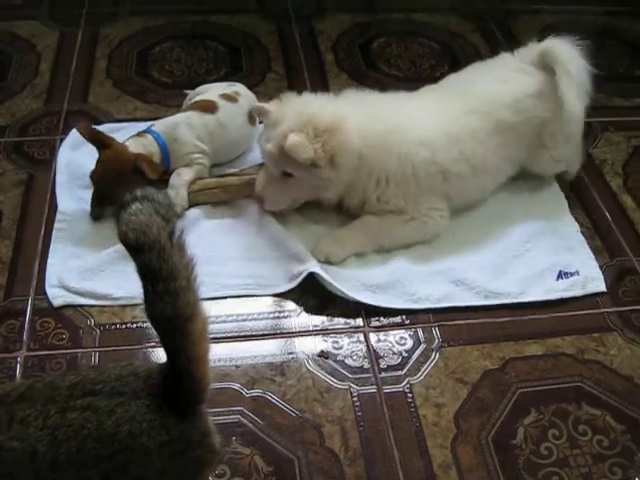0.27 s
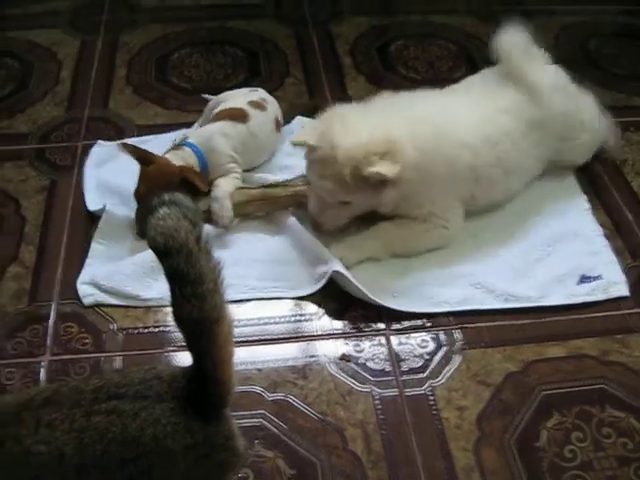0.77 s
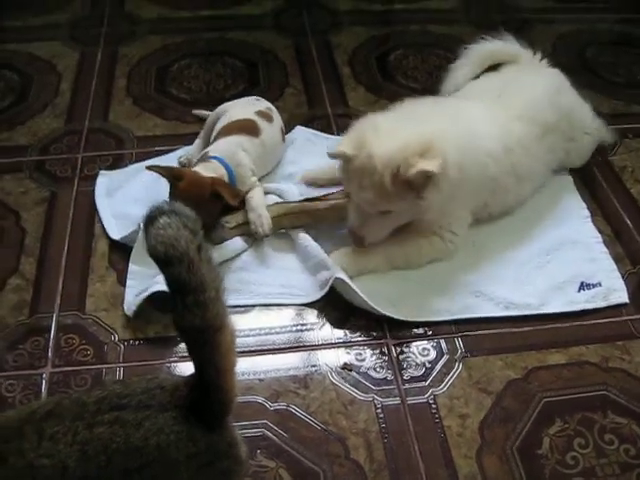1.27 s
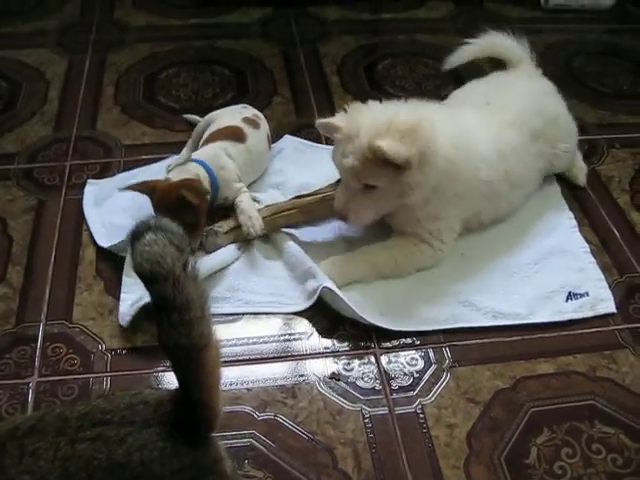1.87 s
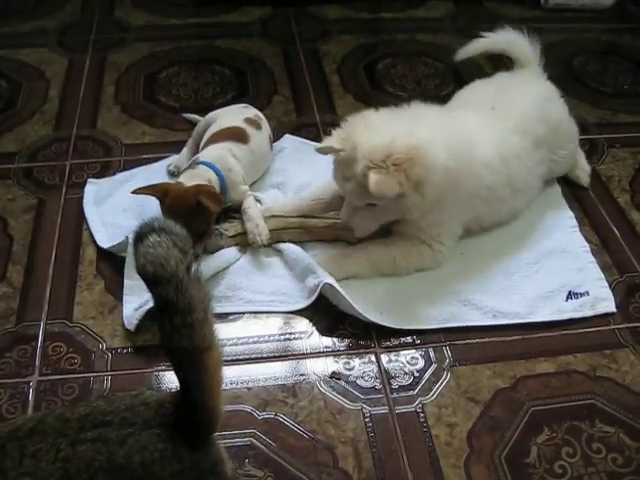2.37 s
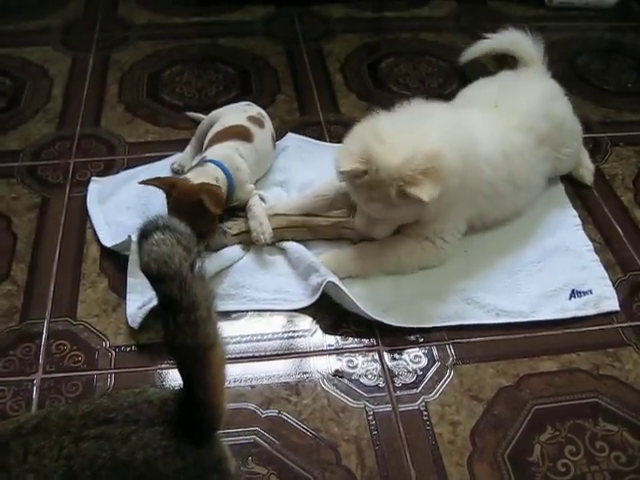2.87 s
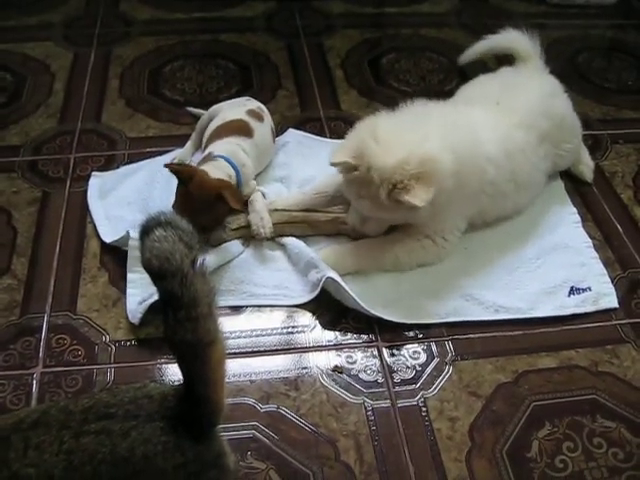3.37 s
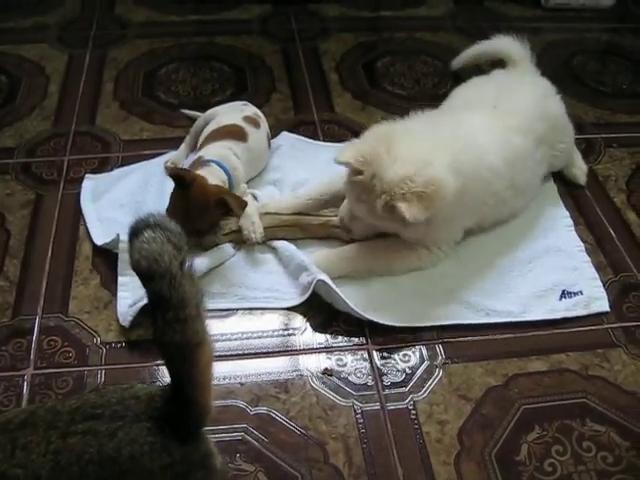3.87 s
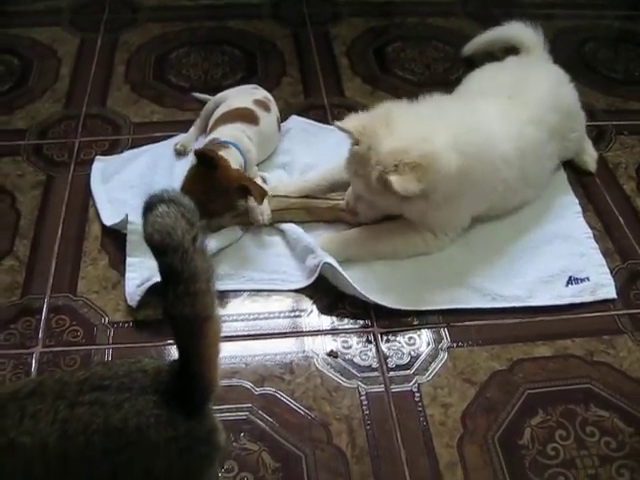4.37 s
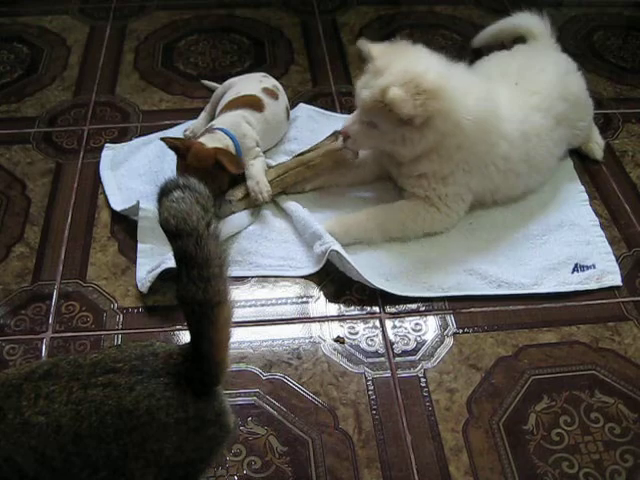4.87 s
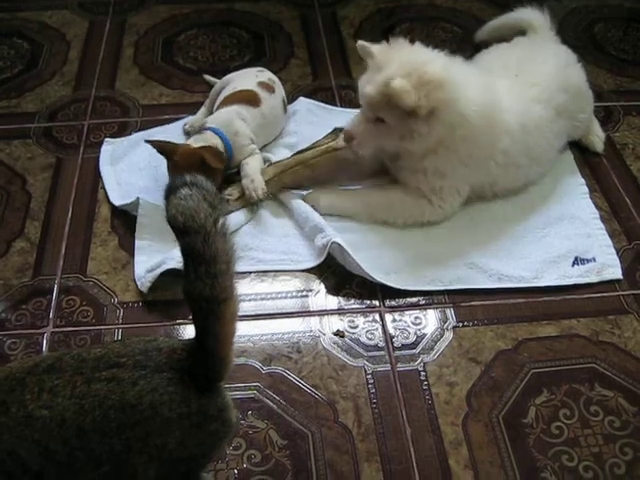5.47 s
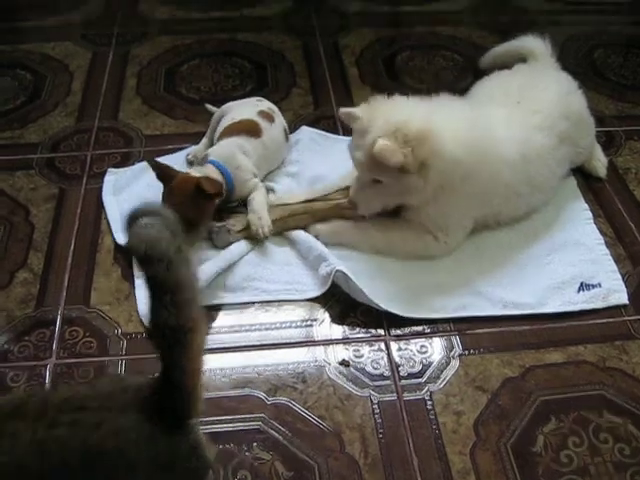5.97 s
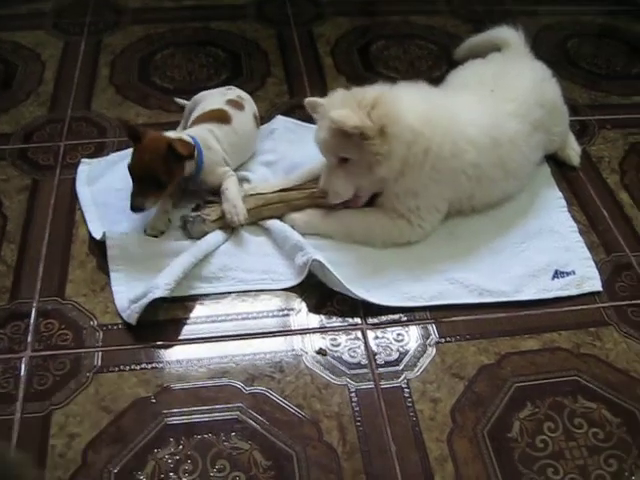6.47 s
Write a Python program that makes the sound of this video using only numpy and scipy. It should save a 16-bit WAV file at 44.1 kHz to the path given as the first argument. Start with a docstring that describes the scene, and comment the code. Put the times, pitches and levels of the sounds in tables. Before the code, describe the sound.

Close at the microphone, fingers rub and squeak over a plastic case for just over a second, with small clicks. Then the tiled room is quiet: two puppies' teeth tick and crack sparsely on a chew bone, the bone knocks the padded floor once, and a wall clock steps softly each second over faint hiss and whirr. Near the end the case snaps very loudly, followed by light rubbing.

```python
"""Puppies gnawing in a tiled room

In the room two puppies gnaw a chew bone on a towel: cracks and damped mouth modes, rasping drags, one
floor knock with a bounce. A wall clock steps each second as gated noise over a faint steady whirr.
Close on the microphone, fingers rub the camera's case for just over a second as filtered skin slips;
near the end the case snaps loudly, a burst of damped shell modes, and is rubbed again."""
import sys
import numpy as np
from scipy import signal
from scipy.fft import rfft, irfft, next_fast_len
from scipy.io import wavfile
from scipy.ndimage import uniform_filter1d, map_coordinates

SR = 44100
rng = np.random.default_rng(int(sys.argv[2]) if len(sys.argv) > 2 else 0)


def to_wav(s):
    """Save 16-bit WAV."""
    ch = np.atleast_2d(s).T  # columns
    pcm = np.round(np.clip(ch, -1, 1) * 32767)  # PCM
    wavfile.write(sys.argv[1], SR, pcm.astype(np.int16))


N = 296352

# Levels in the tables are relative settings, ahead of the room and the microphone.
# teeth on the bone: start_s, level_db, mouth_hz (lower resonance), crack_db, room_db
BITES = [(1.281, -30, 960, -13, -4), (1.319, -27.5, 1690, 9, -3), (1.361, -32.5, 1030, -3, -1.5),
         (1.809, -29.5, 1045, -16, 2.5), (2.6, -28, 1810, -25, -8), (3.123, -32.5, 818, -7, 1.5),
         (3.139, -30, 860, -18, -11), (3.454, -33, 845, -13, 1.5), (3.816, -28.5, 870, -18, -0.5),
         (3.856, -35.5, 720, -5, -2), (4.312, -29.5, 865, -22.5, 0.5), (4.378, -36.5, 810, 0, -2),
         (5.696, -37, 1100, 12, -13), (5.947, -20, 1120, -17, -7.5), (6.021, -38.5, 1130, -13, 4)]
# a tooth drags along the bone: middle_s, half_length_s, level_db, mouth_hz
GRINDS = [(1.32, 0.0081, -45.5, 2820), (1.447, 0.019, -44, 1500), (1.528, 0.098, -54, 1420),
          (3.827, 0.016, -49, 1350), (4.338, 0.023, -50, 830), (5.87, 0.041, -47, 1680),
          (5.961, 0.013, -43, 1080)]
# sharp crack of tooth or bone: frequency_hz, density_db (per Hz)
CRACK_SPECTRUM = [(200, -50), (700, -1.5), (1500, 2), (2500, 0.5), (4000, -1.5), (6000, -13),
                  (10000, -20.5), (15000, -22)]
# the bone's end knocks the floor through the towel: start_s, level_db
KNOCKS = [(1.931, -24.5), (1.9332, -37)]
# modes of the bone on the padded floor: pitch_hz, level_db, t60_s
BONE_MODES = [(322, -9.5, 0.024), (480, 4, 0.015), (583, -8, 0.051), (670, -1.5, 0.039), (710, -16, 0.01),
              (1197, 0.5, 0.012), (2930, -9, 0.012), (3490, -13, 0.023), (4660, -26, .01)]
# fingers slide on the case: time_s, pressure_db, brightness_db (scratch over ring)
FIRST_RUB = [(0.02, -66, 14), (0.03, -60, 2), (0.074, -41, -5), (0.174, -56.5, 0), (0.246, -32, -8.5),
             (0.294, -44, -0.5), (0.306, -41, -3), (0.444, -34, 0), (0.482, -42, -5), (0.492, -37.5, -7),
             (0.642, -39, -4.5), (0.814, -33, -6), (0.866, -43, -1.5), (0.964, -35.5, -5),
             (0.982, -37, -10), (0.988, -29, -11), (1.044, -42, -1.5), (1.078, -58, 1), (1.13, -48.5, 2),
             (1.164, -48.5, -1.5), (1.25, -50, -5.5)]
# a lighter rub at one brightness: time_s, pressure_db
LAST_RUB = [(6.17, -53.5), (6.366, -44.5), (6.398, -54.5), (6.502, -45), (6.51, -51), (6.556, -49.5),
            (6.608, -55), (6.644, -49.5), (6.72, -55)]
# dull drag of skin: frequency_hz, density_db (per Hz)
DRAG_SPECTRUM = [(100, -46), (330, -30), (460, -3.5), (600, -7), (800, -0.5), (1000, 6.5), (1250, -19),
                 (1600, -9), (3000, -64)]
# the case ringing under the rub: frequency_hz, density_db (per Hz)
RING_SPECTRUM = [(600, -55), (1100, -5.5), (1350, 2.5), (1520, 8), (1850, -0.5), (2200, 0.5), (2600, -35),
                 (4000, -86)]
# bright scratch of skin: frequency_hz, density_db (per Hz)
SCRATCH_SPECTRUM = [(1600, -19.5), (2300, 4.5), (2700, 3.5), (3100, 1), (3550, 1.5), (4200, -5.5),
                    (4700, -9), (5300, -9.5), (6100, -14.5), (7300, -24.5), (10000, -17.5), (13000, -20),
                    (15500, -27)]
# top fizz of hard rubbing: frequency_hz, density_db (per Hz)
FIZZ_SPECTRUM = [(3800, -23), (4800, 4), (5400, 5), (6300, 2.5), (7300, -1), (10000, -2), (12500, -18),
                 (15500, -14)]
# skin sticks and chirrs around one pitch: middle_s, half_length_s, pitch_hz, level_db
CHIRRS = [(0.33, 0.061, 1490, -33.5), (0.41, 0.027, 2020, -32.5), (0.79, 0.069, 2700, -35),
          (0.78, 0.06, 3700, -39), (0.916, 0.011, 1020, -31.5), (1, 0.053, 1070, -35.5),
          (1.028, 0.032, 2360, -36.5), (1.015, 0.044, 4500, -47.5), (6.5, 0.03, 1240, -49)]
# the case catches and lets go: start_s, level_db
SLIPS = [(.201, -21.5), (0.246, -31), (0.309, -16.5), (0.346, -17.5), (0.915, -23), (0.99, -20),
         (1.009, -16.5), (1.020, -20), (5.812, -23), (5.9482, -23)]
# the case snaps under the grip: start_s, level_db
SNAP = (6.144, 2)
# soft bumps of a finger on the case: middle_s, level_db, pitch_hz
BUMPS = [(0.857, -32.5, 330), (3.718, -28, 406), (5.812, -42, 130)]
# modes of the case: pitch_hz, level_db, t60_s
CASE_MODES = [(1220.0, -3.1, 0.0067), (1590.0, 2.1, 0.0059), (1490.0, -22.4, 0.0374),
              (2150.0, -12.6, 0.0043), (2450.0, -0.7, 0.0044), (3690.0, -7.3, 0.0072),
              (4870.0, -8.4, 0.0051), (6030.0, -13.8, 0.0057), (10860.0, -11.7, 0.002),
              (14890.0, -17.2, 0.0018)]
# noise of the clock's gears: frequency_hz, density_db (per Hz)
GEAR_SPECTRUM = [(300, -15.5), (650, -4), (820, -31), (1300, 0), (1700, -2.5), (2300, 2.5), (2900, -3.5),
                 (3600, -6), (4400, -7.5), (6500, -13.5), (9000, -27), (15000, -30)]
# resonances of the clock's body: pitch_hz, half_width_hz, level_db
CLOCK_BODY = [(1085, 68, -3), (2110, 110, -7.5), (3510, 76, -9.5)]
# room air: frequency_hz, density_db (per Hz)
AIR_SPECTRUM = [(15, -54), (25, -10), (157, -4), (199, -4), (290, -3), (319, -3), (444, -3.5), (549, -1.5),
                (728, -3.5), (1190, -6), (1440, -1), (2100, -9), (3370, -11.5), (7000, -18.5), (9100, -66),
                (15400, -120)]
# microphone hiss: frequency_hz, density_db (per Hz)
HISS_SPECTRUM = [(4000, -65), (7000, -9), (10000, -3), (12500, -8), (16000, -8.5)]
# narrow bands of the appliance: pitch_hz, half_width_hz, level_db
WHIRR = [(1441, 25, -63.5), (3406, 16, -72.5), (15734, 6, -96)]
# decay of the room's tail: frequency_hz, t60_s
ROOM_DECAY = [(200, 0.16), (600, 0.41), (2000, 0.42), (6000, 0.52), (14000, 0.044)]

FIRM_DB = -36  # pressure of a firm stroke
DRAG_GROWS, FIZZ_GROWS = 1, 1.46  # dB per dB of pressure, and per dB of scratch
TOUCH_S, LIFT_S = 0.01, 0.06  # the fingers land and leave
# one clock step: the gears start, run briefly and stop; the room rings on
TICK_ATTACK_S, TICK_HOLD_S, TICK_T60_S = 0.012, 0.037, 0.22
TICK_ROOM_DB, TICK_ROOM_T60_S = -4, 0.51
AIR_DB, HISS_DB = -53.5, -65.0
TOP_HZ = 15900  # upper limit of the microphone's band


def amp(db):
    """Decibels to amplitude."""
    return 10 ** (np.asarray(db) / 20)


def unit(x):
    """Scale to rms 1."""
    return x / np.sqrt(np.mean(x ** 2) + 1e-20)


def along(points, hz):
    """Interpolate (frequency, value) points on a log frequency axis."""
    f, values = np.transpose(points)
    return np.interp(np.log(hz + 1), np.log(f), values)


def filtered(x, response):
    """Multiply the spectrum of x by a response of frequency."""
    size = next_fast_len(len(x) + 8192)
    spectrum = rfft(x, size) * response(np.fft.rfftfreq(size, 1 / SR))
    return irfft(spectrum, size)[:len(x)]


def coloured(x, spectrum):
    """Shape x with a spectrum, at rms 1."""
    return unit(filtered(x, lambda hz: amp(along(spectrum, hz))))


def band(hz, half_width_hz):
    """Noise in one narrow resonance, 6 dB down at the half width, at rms 1."""
    noise = rng.standard_normal(N)
    return unit(filtered(noise, lambda f: 1 / (1 + ((f - hz) / half_width_hz) ** 2)))


def swell(middle_s, half_s):
    """Bell-shaped stroke around a time."""
    return np.exp(-((np.arange(N) / SR - middle_s) / half_s) ** 2)


def add(track, start_s, sound):
    """Mix a sound into the track from a start time."""
    part = track[round(start_s * SR):][:len(sound)]
    part += sound[:len(part)]


def ring(modes, t):
    """Damped modes after one blow."""
    return sum(amp(db - 60 * t / t60) * np.sin(2 * np.pi * hz * t) for hz, db, t60 in modes)


def friction(slip_rate, smooth):
    """Tiny slips of uneven size, slip_rate a second, on a bed of smooth sliding noise."""
    slips = (rng.random(N) < slip_rate / SR) * rng.uniform(-1.15, 1, N)
    return unit(slips) + smooth * rng.standard_normal(N)


def in_room(x, early_db, tail_db, early_t60=0.082):
    """Add dense early echoes off the tiles and a longer tail, drawn anew for each sound."""
    hz, t, z = signal.stft(rng.standard_normal(SR // 2), SR, nperseg=256)
    decay = amp(-60 * t / along(ROOM_DECAY, hz)[:, None])
    tail = signal.istft(z * decay, SR, nperseg=256)[1]
    t = np.arange(len(tail)) / SR
    early = rng.standard_normal(len(t)) * amp(-60 * t / early_t60)
    echoes = amp(early_db) * early / np.linalg.norm(early)
    echoes += amp(tail_db) * tail / np.linalg.norm(tail)
    onset = 1 - np.exp(-t / 0.0012)
    return x + signal.fftconvolve(x, echoes * onset)[:len(x)]


def gnawing():
    """Each bite is a short crack plus the ring of the mouth around the bone; hard cracks ring less."""
    out, t = np.zeros(N), np.arange(SR // 2) / SR
    for start_s, db, mouth_hz, crack_db, room_db in BITES:
        mouth = ring([(mouth_hz, 0, 0.012), (1.325 * mouth_hz, -6, 0.008)], t)
        mouth *= 1 - np.exp(-t / 0.0005)
        crack = coloured(rng.standard_normal(len(t)), CRACK_SPECTRUM)
        crack *= amp(crack_db + 3.0 - 60 * t / 0.015)
        # hold the bite's level down as the crack grows
        bite = (mouth + crack) / np.sqrt(1 + amp(crack_db + 7.5) ** 2)
        add(out, start_s, amp(db) * in_room(bite, early_db=room_db, tail_db=room_db))
    return out


def grinding(rasp_db=-3, mouth_db=-3):
    """A dragging tooth rasps by friction, with a band of noise for the mouth around it."""
    rasp = amp(rasp_db) * coloured(friction(slip_rate=1100, smooth=1.0), CRACK_SPECTRUM)
    out = np.zeros(N)
    for middle_s, half_s, db, mouth_hz in GRINDS:
        mouth = amp(mouth_db) * band(mouth_hz, 0.13 * mouth_hz)
        out += amp(db) * swell(middle_s, half_s) * (rasp + mouth)
    return out


def bone_knock(crack_db=-9):
    """The tugged bone drops on the padded floor and bounces once; it is too small to radiate bass."""
    out, t = np.zeros(N), np.arange(SR // 2) / SR
    for start_s, db in KNOCKS:
        crack = coloured(rng.standard_normal(len(t)), CRACK_SPECTRUM)
        crack *= amp(crack_db - 60 * t / 0.014)
        body = ring(BONE_MODES, t) * (1 - np.exp(-t / 0.0004))
        add(out, start_s, amp(db) * in_room(body + crack, early_db=-4.5, tail_db=-6.5))
    return signal.sosfilt(signal.butter(4, 250, "high", fs=SR, output="sos"), out)


def patchy(x, depth_db):
    """As the skin shifts, patches of the spectrum swell and fade at random."""
    z = signal.stft(x, nperseg=512)[2]
    across_pitch = uniform_filter1d(rng.standard_normal(z.shape), size=5, axis=0)
    field = uniform_filter1d(across_pitch, size=12, axis=1)
    return unit(signal.istft(z * amp(depth_db * unit(field)), nperseg=512)[1][:N])


def rubbing(rows, brightness_db, slip_rate, drag_db, ring_db, scratch_db, fizz_db, flutter_db,
            flutter_rate=130):
    """Fluttering skin slips drive a dull drag, the case's ring, a scratch and fizz; all grow with pressure."""
    time_s, pressure_db = np.transpose(rows)[:2]
    t = np.arange(N) / SR
    press = np.interp(t, time_s, pressure_db - FIRM_DB)
    scratch = np.interp(t, time_s, pressure_db - FIRM_DB + brightness_db)
    landing = [time_s[0] - TOUCH_S, time_s[0], time_s[-1], time_s[-1] + LIFT_S]
    contact = np.interp(t, landing, [0, 1, 1, 0])
    # random level curve through flutter_rate points a second
    flutter = map_coordinates(rng.standard_normal(N // 32), [t * flutter_rate], mode="wrap")
    skin = patchy(friction(slip_rate, smooth=0.89), depth_db=1.5) * amp(flutter_db * flutter)
    sound = amp(DRAG_GROWS * press + drag_db) * coloured(skin, DRAG_SPECTRUM)
    sound += amp(press + ring_db) * coloured(skin, RING_SPECTRUM)
    sound += amp(scratch + scratch_db) * coloured(skin, SCRATCH_SPECTRUM)
    # the fizz grows faster than the scratch, so it favours hard strokes
    sound += amp(FIZZ_GROWS * scratch + fizz_db) * coloured(skin, FIZZ_SPECTRUM)
    return amp(FIRM_DB) * contact * sound


def chirrs(relative_width=0.1):
    """Where the skin sticks, its slips gather briefly around one pitch: a swell of narrow noise."""
    return sum(amp(db) * swell(middle_s, half_s) * band(hz, relative_width * hz)
               for middle_s, half_s, hz, db in CHIRRS)


def case_clicks(skin_hz=3000):
    """Slips, the snap and bumps reach the microphone through the case; the snap has almost no room."""
    out, t = np.zeros(N), np.arange(SR // 4) / SR
    # alternate modes of the shell swing in opposite directions
    shell = ring(CASE_MODES[0::2], t) - ring(CASE_MODES[1::2], t)
    click = shell * (1 - np.exp(-t / 0.0002))
    click /= np.abs(click).max()
    # soft skin excites the high modes less than the hard snap does
    soft_click = signal.sosfilt(signal.butter(1, skin_hz, fs=SR, output="sos"), click)
    for start_s, db in SLIPS:
        add(out, start_s, amp(db) * in_room(soft_click, early_db=-2, tail_db=-14))
    snap_s, snap_db = SNAP
    add(out, snap_s, amp(snap_db) * in_room(click, early_db=-28, tail_db=-51))
    for middle_s, db, hz in BUMPS:
        # one push in and out, a single cycle long
        cycle = 2 * np.pi * hz * (t - 0.004)
        add(out, middle_s - 0.004, -amp(db) * cycle * np.exp(-cycle ** 2 / 2))
    return out


def clock(first_s=0.11, period_s=1.0, level_db=-49):
    """Gears step once a second and ring the clock's body; the room smears each step to a soft rasp."""
    since = (np.arange(N) / SR - first_s + period_s / 2) % period_s - period_s / 2
    gears = coloured(friction(slip_rate=1600, smooth=0.33), GEAR_SPECTRUM)
    body = sum(amp(db) * band(hz, half_width) for hz, half_width, db in CLOCK_BODY)
    attack = np.clip(1 + since / TICK_ATTACK_S, 0, 1)
    stopped = np.maximum(since - TICK_HOLD_S, 0)
    direct = amp(-60 * stopped / TICK_T60_S)
    room = amp(TICK_ROOM_DB - 60 * stopped / TICK_ROOM_T60_S)
    return amp(level_db) * attack * np.maximum(direct, room) * (gears + body)


def background():
    """Room air and microphone hiss as shaped noise, and an appliance's whirr as narrow bands."""
    air = amp(AIR_DB) * coloured(rng.standard_normal(N), AIR_SPECTRUM)
    hiss = amp(HISS_DB) * coloured(rng.standard_normal(N), HISS_SPECTRUM)
    whirr = sum(amp(db) * band(hz, half_width) for hz, half_width, db in WHIRR)
    return air + hiss + whirr


def scene():
    """The puppies and the clock out in the room, hand noise close on the microphone."""
    puppies = gnawing() + grinding() + bone_knock()
    brightness_db = np.transpose(FIRST_RUB)[2]
    hand = rubbing(FIRST_RUB, brightness_db, slip_rate=3000, drag_db=-7, ring_db=-1.5,
                   scratch_db=-2.5, fizz_db=-9.5, flutter_db=0.5)
    hand += rubbing(LAST_RUB, brightness_db=-6.5, slip_rate=1200, drag_db=-5, ring_db=-2.5,
                    scratch_db=-2.0, fizz_db=-32, flutter_db=1.4, flutter_rate=100)
    hand += chirrs() + case_clicks()
    return (puppies + hand + clock() + background())[None]


def record(dry, notch_hz=7900, notch_width_hz=500, notch_db=-17):
    """The microphone saturates on loud peaks, and has a narrow treble notch and a band limit."""
    limited = dry[0] / (1 + np.abs(dry[0] / 0.76) ** 6) ** (1 / 6)

    def response(hz):
        """Notch and band limit together."""
        notch = amp(notch_db / (1 + (2 * (hz - notch_hz) / notch_width_hz) ** 2))
        return notch * (hz < TOP_HZ)

    return filtered(limited, response)[None]


dry = scene()
out = record(dry)
to_wav(out)
```